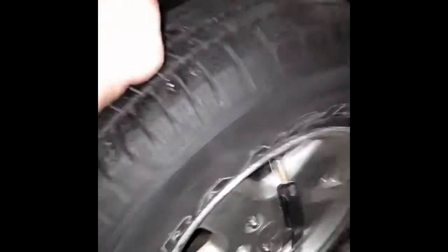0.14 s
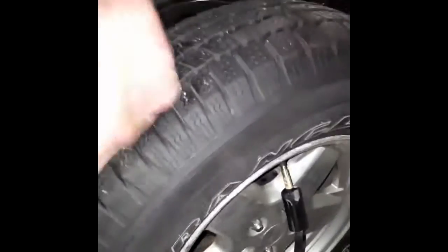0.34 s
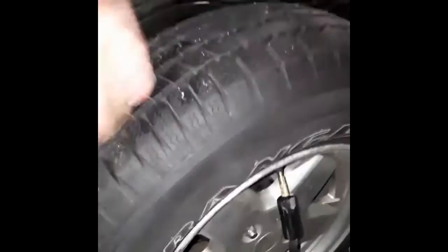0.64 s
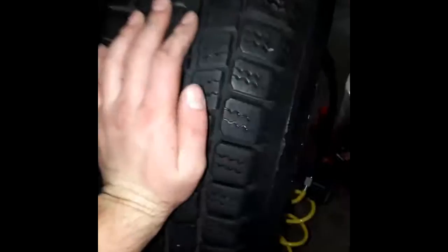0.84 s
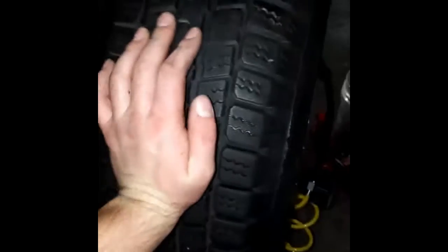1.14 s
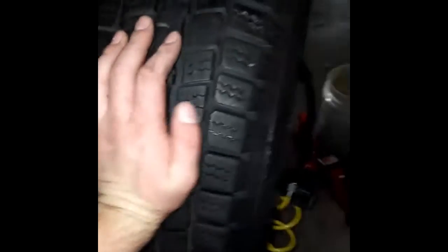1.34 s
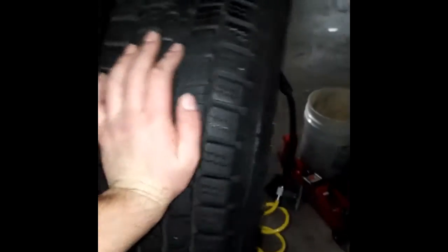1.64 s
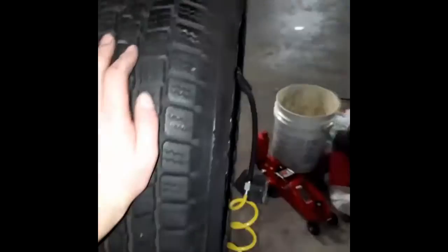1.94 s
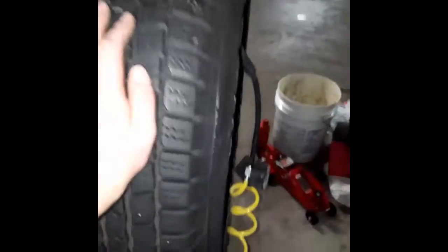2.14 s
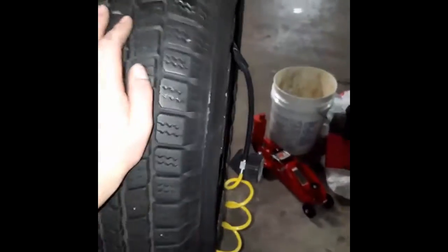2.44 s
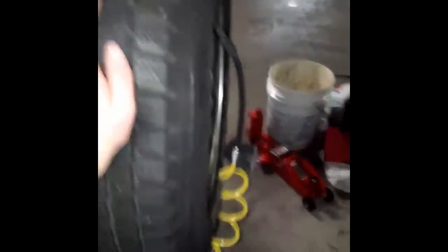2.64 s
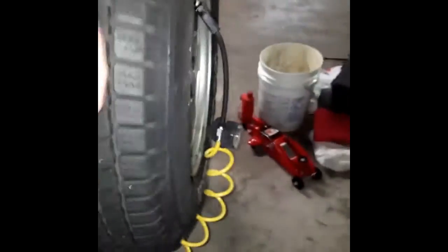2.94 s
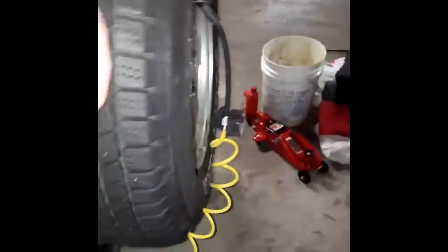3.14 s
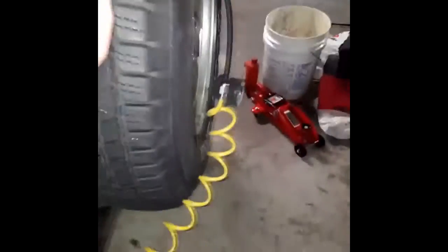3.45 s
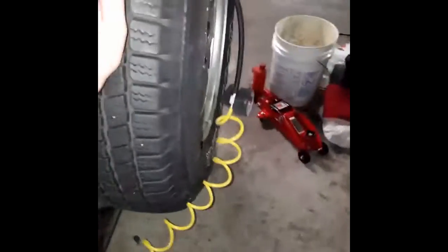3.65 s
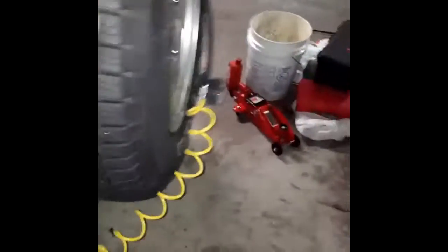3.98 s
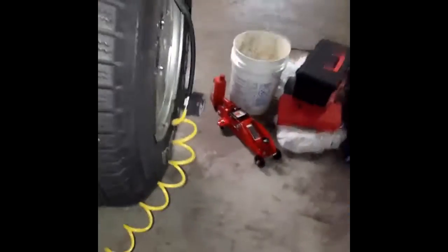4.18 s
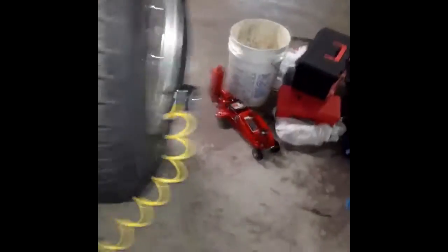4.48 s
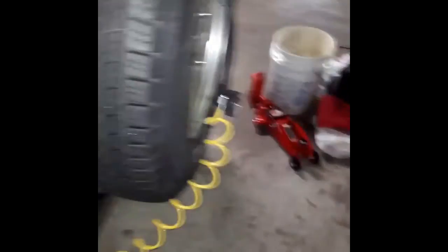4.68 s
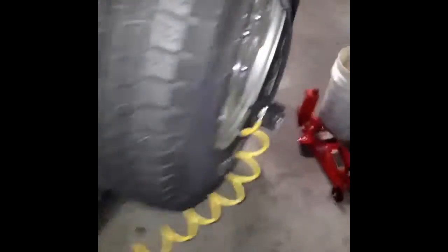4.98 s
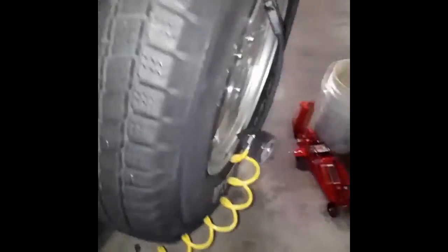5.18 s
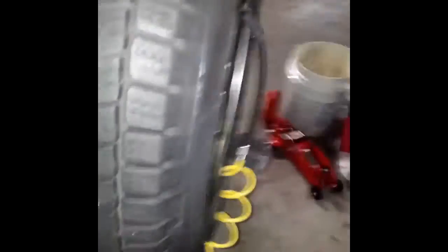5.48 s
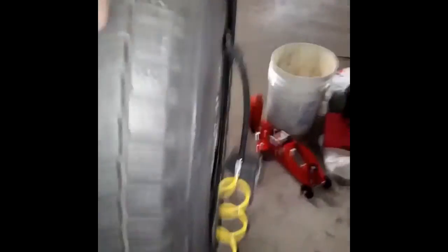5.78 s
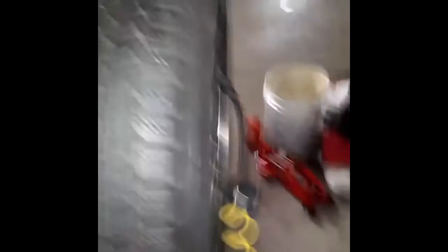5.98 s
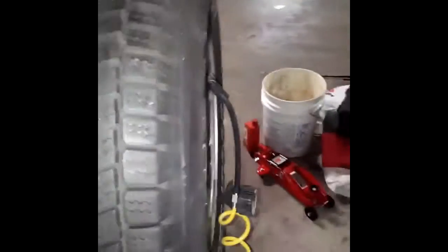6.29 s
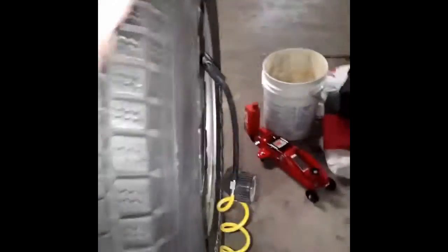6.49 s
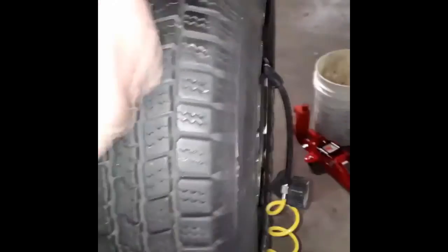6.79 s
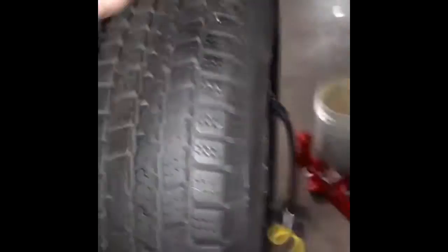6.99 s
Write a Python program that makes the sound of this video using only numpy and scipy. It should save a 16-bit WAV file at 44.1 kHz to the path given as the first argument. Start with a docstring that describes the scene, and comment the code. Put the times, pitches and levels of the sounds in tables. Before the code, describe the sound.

Handheld close recording beside a tire. Three low, hollow palm slaps come first in near quiet, then everything cuts to silence. A compressor's rapid harsh buzz fades up with a low throb felt through the tire, becoming clearer and more metallic with hissing air. Later six sharper, cracking slaps fall regularly over the running pump, which ducks after each hit and sounds more muffled toward the end.

```python
"""A small piston inflator drones, rattles and puffs in a garage, close to a car tire that partly shades it.
First a hand slaps the tire three times; after a silent pause the sound fades in on the running pump.
A palm resting on the tire feeds the pump's low throb to the microphone, then slaps six more times.
The pump brightens as the microphone comes round the tire into plain view and dulls as it goes back.
Loud slaps turn the recorder's gain down. Sources: decaying sines, filtered noise, harmonics of the stroke."""
import sys
import numpy as np
from scipy import signal
from scipy.fft import rfft, irfft, next_fast_len
from scipy.io import wavfile
from scipy.ndimage import map_coordinates

SR = 44100
rng = np.random.default_rng(int(sys.argv[2]) if len(sys.argv) > 2 else 0)


def wav_record(signal):
    """Record a signal, one row per channel, as 16-bit PCM in the file named by sys.argv[1]."""
    frames = np.transpose(np.atleast_2d(signal))
    bounded = np.clip(frames, -1, 1)
    # unit amplitude maps onto the largest positive 16-bit level
    quanta = np.round(bounded * 32767).astype(np.int16)
    wavfile.write(sys.argv[1], SR, quanta)


N = 314151
TIME = np.arange(N) / SR


def amp(db):
    """Decibels to gain."""
    return 10 ** (np.asarray(db) / 20)


def unit(x):
    """Scales to rms 1."""
    return x / np.sqrt(np.mean(x ** 2) + 1e-20)


def read(points, hz):
    """Reads a table on a log-frequency (or log-order) axis."""
    f, value = np.transpose(points)
    return np.interp(np.log(hz + 1), np.log(f + 1), value)


def curve(points):
    """A time table, sample by sample."""
    return np.interp(TIME, *np.transpose(points))


def add(mix, s, sound):
    """Lays a sound into the mix at time s."""
    part = mix[max(round(s * SR), 0):][:len(sound)]
    part += sound[:len(part)]


def noise(colour, size=N):
    """Noise of rms 1 with the given spectrum."""
    length = next_fast_len(size)
    gain = amp(read(colour, np.fft.rfftfreq(length, 1 / SR)))
    spectrum = rfft(rng.standard_normal(length)) * gain
    return unit(irfft(spectrum, length)[:size])


def wander(per_s):
    """A smooth random drift of rms 1, with per_s random knots a second."""
    knots = rng.standard_normal(int(N / SR * per_s) + 4)
    drift = map_coordinates(knots, [TIME[::64] * per_s], order=3, mode="nearest")
    return unit(drift)[np.arange(N) // 64]


# The tire's rubber and air cavity: (frequency [Hz], relative level [dB], t60 [s])
TIRE_MODES = [(79, -14.5, 0.071), (122.8, -22, 0.79), (129, -22, 0.38), (185, -14, 0.13),
              (234, -10.5, 0.085), (266.8, -24, 0.41), (341, -27, 0.11), (400, -47, 0.12), (498, -57, 0.54)]
# Dense flexing of the sidewall: (frequency [Hz], relative level [dB per Hz])
SIDEWALL_COLOUR = [(50, -13), (110, -13.5), (180, 5), (290, 8), (370, -3), (520, -11), (800, -19.5),
                   (2000, -52.5)]


def thump(hz, ring_db, rise_s=0.0024, tread_hz=370, tread_db=-11):
    """The tread dents, snaps and springs back, then the tire rings and its sidewall shudders."""
    t = np.arange(SR // 2) / SR
    bent_time = t + 0.00092 * (1 - np.exp(-t / 0.00053))  # the pitch starts high and settles at hz
    dent_envelope = (t / rise_s / 2) ** 2 * np.exp(2 - t / rise_s)
    dent = -np.sin(2 * np.pi * hz * bent_time) * dent_envelope
    snap_envelope = t / 0.0032 * np.exp(1 - t / 0.0031)
    snap = -amp(tread_db) * np.sin(2 * np.pi * tread_hz * t) * snap_envelope
    ring = np.zeros(len(t))
    for f, db, t60 in TIRE_MODES:
        ring += amp(db - 60 * t / t60) * np.sin(2 * np.pi * (f * t + rng.random()))
    shudder = amp(-16.5 - 60 * t / 0.28) * noise(SIDEWALL_COLOUR, size=len(t))
    onset = 1 - np.exp(-(t / 0.0056) ** 2)
    return dent + snap + amp(ring_db) * (ring + shudder) * onset


# Skin on rubber, for smacks and rubs: (frequency [Hz], relative level [dB per Hz])
SKIN_COLOUR = [(100, -17), (400, 17), (800, -2.5), (1700, 3.5), (2900, -4), (3700, -2.5), (5500, -8),
               (7300, 0), (8500, -19), (10000, -37.5), (13000, -20.5), (16000, -23)]


def smack(bright_db, cup_hz, cup_db=7, decay_s=0.0025, size=2048):
    """Air squeezed from under the cupped palm cracks for a few milliseconds."""
    t = np.arange(size) / SR
    hz = np.geomspace(50, SR / 2, num=200)
    cup_peak_db = cup_db * np.exp(-(np.log(hz / cup_hz) / 0.09) ** 2)
    colour_db = read(SKIN_COLOUR, hz) + bright_db * np.log2(hz) + cup_peak_db
    decay = 1.09 * np.exp(-t / decay_s) + 0.037 * np.exp(-t / 0.02)
    envelope = (1 - np.exp(-t / 0.00016)) * decay
    return noise(np.column_stack([hz, colour_db]), size=size) * envelope


# The palm rubs over the tread: (time [s], level at the height of the stroke [dB])
TREAD_RUBS = [(.385, -68), (.44, -65), (.665, -57), (.735, -52), (.805, -62)]
RUB_RISE_S, RUB_FADE_S = .015, .025


def rubbing(grain_db=2.0):
    """Skin drags over the tread in short, grainy strokes."""
    pressure = np.zeros(N)
    t = TIME[:SR // 2]
    stroke = np.minimum(t / RUB_RISE_S, np.exp((RUB_RISE_S - t) / RUB_FADE_S))
    for s, db in TREAD_RUBS:
        add(pressure, s, amp(db) * stroke)
    return pressure * amp(grain_db * wander(120)) * noise(SKIN_COLOUR)


# How long the garage rings: (frequency [Hz], t60 [s])
GARAGE_DECAY = [(60, 0.71), (160, 0.68), (420, .42), (1100, 0.61), (3000, 0.19), (8000, 0.36)]


def garage(x):
    """Dense wall echoes, each band dying at its own speed."""
    taps = rng.standard_normal(SR // 2) * (TIME[:SR // 2] > .011)  # the first wall answers after 11 ms
    hz, t, z = signal.stft(taps, SR, nperseg=256)
    decay = amp(-60 * t / read(GARAGE_DECAY, hz)[:, None])
    tail = signal.istft(z * decay, SR, nperseg=256)[1]
    return signal.fftconvolve(x, tail / np.linalg.norm(tail))[:N]


# Slaps on the tire: (time [s], thump level [dB], thump pitch [Hz], smack level [dB],
# smack brightness [dB per octave], cupped-palm pitch [Hz], ring re thump [dB], rebound re thump [dB])
TIRE_SLAPS = [(.006, -11, 127, -24.5, 1, 3400, -3.5, -19),
              (0.3616, -12.5, 124, -22.5, -0.5, 3600, -0.5, -25.5),
              (.652, -8.5, 125, -23, -.5, 1650, -3, -18), (5.046, -15.5, 142, -14.5, 0, 3320, -4, -11),
              (5.451, -14.5, 140, -13, 1, 2600, 0, -14), (5.7926, -9.5, 128, -14, 2, 2460, -0.5, -19),
              (6.1468, -11.5, 143, -12, -1.5, 3570, 2, -11.5), (6.483, -7, 115, -16, -1.5, 1380, -2, -7),
              (6.819, -8.5, 125, -19.5, -0.5, 3420, 0.5, -15)]
# Soft knocks: nudges of the hand, and at 6.509 s a further bounce of the tire after the slap before it: (time
# [s], level [dB], pitch [Hz])
SOFT_KNOCKS = [(.748, -32, 174), (2.765, -37, 130), (3.442, -38, 89), (4.40, -37, 150), (4.541, -34, 109),
               (4.58, -40, 130), (6.326, -31, 110), (6.509, -17, 177)]
# The tire rebounds after each slap; soft knocks leave it ringing more than slaps do
REBOUND_S, REBOUND_HZ, SOFT_RING_DB = .057, 204, 5


def hand():
    """Slaps with their rebounds, nudges and rubs on the tire; the garage answers all but the rubs."""
    thumps, smacks = np.zeros((2, N))
    for s, db, hz, smack_db, bright_db, cup_hz, ring_db, rebound_db in TIRE_SLAPS:
        add(thumps, s, amp(db) * thump(hz, ring_db))
        add(thumps, s + REBOUND_S, amp(db + rebound_db) * thump(REBOUND_HZ, SOFT_RING_DB))
        add(smacks, s, amp(smack_db) * smack(bright_db, cup_hz))
    for s, db, hz in SOFT_KNOCKS:
        add(thumps, s, amp(db) * thump(hz, SOFT_RING_DB))
    close = thumps + smacks
    return close + rubbing() + garage(amp(-13) * close)


# The quiet garage: (frequency [Hz], relative level [dB per Hz])
QUIET_COLOUR = [(30, -2), (130, 2), (400, -8.5), (900, -21.5), (3000, -27), (7200, -37.5), (7650, -15),
                (8000, -35), (15000, -50.5)]


def quiet_garage():
    """Steady, faint background noise."""
    return amp(-60) * noise(QUIET_COLOUR)


def ring_phase(lines, size=4096):
    """Minimum phases, which make a set of lines start as one blow and ring out after it."""
    order, db = np.transpose(lines)
    log_gain = np.log(amp(np.interp(abs(np.fft.fftfreq(size, 1 / size)), order, db)))
    return -signal.hilbert(log_gain).imag[np.round(order).astype(int)]


def strokes(turns, lines, at, scatter, size=4096):
    """One blow per turn at crank position at, ringing on; scatter [rad rms] loosens the phases."""
    order, db = np.transpose(lines)
    phase = ring_phase(lines) - 2 * np.pi * order * at + scatter * rng.standard_normal(len(order))
    spectrum = np.zeros(size // 2 + 1, complex)
    spectrum[np.round(order).astype(int)] = amp(db) * np.exp(1j * phase)
    one_turn = irfft(spectrum) * size / np.sqrt(2)
    return np.interp(turns % 1, np.arange(size) / size, one_turn, period=1)


def moving_echo(turns, lines, share, count=2):
    """Wall echoes of the strokes swell and fade line by line as the microphone moves about."""
    echoes = np.zeros(N)
    for _ in range(count):
        echoes += wander(1.272) * strokes(turns, lines, at=0, scatter=np.pi)
    return share * echoes / np.sqrt(count)


def metal_part(turns, lines, at, scatter, echo, uneven_db, gain_db=0):
    """A part struck once a turn with uneven force, heard with its echoes."""
    blows = strokes(turns, lines, at, scatter) + moving_echo(turns, lines, echo)
    return amp(gain_db) * unit(blows * amp(uneven_db * wander(61)))


def puff(turns, at, length, rest):
    """Air escapes once a turn as the valve opens, over a steady leak; at and length in turns."""
    age = (turns - at) % 1
    return unit(rest + np.exp(-age / length) * (1 - np.exp(-age / 0.033)))


def in_sight(part, view):
    """Gain of a part of the pump: it grows as the microphone comes round the tire."""
    shaded_db, gained_db = part
    return amp(shaded_db + gained_db * view)


# The palm rests on the tire: (lands [s], lifts [s], firmness at landing [dB])
PALM_RESTS = [(1.14, 2.768, 2), (6.323, 7.3, -4)]
TOUCH_S, EASE_DB_PER_S = 0.022, 5  # it lands and lifts quickly, and eases off while it rests
DIP_DEPTH, DIP_S = 0.47, 0.014


def palm():
    """How firmly the palm presses on the tire, and two brief dips of the drone."""
    contact, dip = np.zeros(N), np.ones(N)
    for lands, lifts, db in PALM_RESTS:
        touching = np.clip(np.minimum(TIME - lands, lifts - TIME) / TOUCH_S + .5, 0, 1)
        contact += touching * amp(db - EASE_DB_PER_S * (TIME - lands))
        for s in (lands, lifts):
            dip -= DIP_DEPTH * np.exp(-((TIME - s) / DIP_S) ** 2)
    return contact, dip


# Stroke lines with the pump in plain view: (multiple of the stroke rate, relative level [dB])
PLAIN_LINES = [(1, -27.5), (2, -21), (3, -44.5), (4, -32), (5, -28.5), (6, -29.5), (7, -4.5), (8, -6.5),
               (9, -1), (10, -22.5), (11, -8), (12, -13.5), (13, -20.5), (14, -36.5), (15, -22.5),
               (16, -25.5), (17, -18.5), (18, -30.5), (19, -29.5), (20, -28), (21, -20), (22, -35.5),
               (23, -22.5), (24, -26), (25, -36.5), (26, -25)]
# Stroke lines with the tire in the way: (multiple of the stroke rate, relative level [dB])
SHADED_LINES = [(1, -17), (2, -19.5), (3, -18), (4, -21), (5, -19.5), (6, -19), (7, -22.5), (8, -9), (9, 1),
                (10, -14), (11, -27), (12, -19.5), (13, -26.5), (14, -54), (15, -30), (16, -17), (17, -24),
                (18, -15.5), (19, -30.5), (20, -41), (21, -27), (22, -15.5), (23, -54), (24, -28.5),
                (25, -33), (26, -34.5)]
# Throb through the tire into the palm: (multiple of the stroke rate, level before firmness [dB])
PALM_THROB = [(1, -45.5), (2, -37), (3, -53), (4, -59.5), (5, -43), (6, -39), (7, -36.5), (8, -41.5),
              (9, -44), (10, -104)]
# Cylinder's knock: (time [s], level before the knock gain [dB])
KNOCK_COURSE = [(1.46, -44), (1.77, -44), (3.38, -41.5), (4.04, -54), (4.21, -46), (4.57, -60),
                (5.01, -41.5), (7.1, -44)]
# Overtone just below the main tone, fading and returning: (time [s], level, only its change counts [dB])
OVERTONE_COURSE = [(1.46, -27), (2.31, -37.5), (2.53, -30.5), (2.75, -40.5), (4.14, -30.5), (5.92, -33.5),
                   (6.25, -29.5), (7.1, -31.5)]
OVERTONE_ORDER = 8
DRONE = (-24, 0.98)  # (dB with the tire in the way, dB gained in plain view)


def pump_drone(turns, view, at=0.2007, spread=0.125, knock_gain_db=17.0, sway_db=2.0):
    """Low lines of the stroke: the tire shades some, and a resting palm feeds the lowest to the microphone."""
    contact, dip = palm()
    overtone_db = curve(OVERTONE_COURSE)
    drone_gain = in_sight(DRONE, view)
    knock_gain = amp(curve(KNOCK_COURSE) + knock_gain_db)
    drone = np.zeros(N)
    lines = zip(PLAIN_LINES, SHADED_LINES, ring_phase(PLAIN_LINES))
    for order, ((_, seen_db), (_, shaded_db), phase) in enumerate(lines, 1):
        knock = np.exp(-((order - 17) / 2.4) ** 4)  # how far this line belongs to the cylinder's knock
        # standing waves: higher lines waver more as the microphone moves
        sway = sway_db * order / len(PLAIN_LINES) * wander(2.45)
        if order == OVERTONE_ORDER:
            sway = sway + overtone_db - overtone_db.mean()
        line_gain = amp(view * seen_db + (1 - view) * shaded_db + sway)
        airborne = drone_gain ** (1 - knock) * knock_gain ** knock * line_gain
        gain = airborne + contact * amp(read(PALM_THROB, order))
        lag = spread * (order - 8) ** 2  # the garage's echoes smear each blow over the turn
        drone += np.sqrt(2) * gain * np.cos(2 * np.pi * order * (turns - at) + phase - lag)
    return drone * dip * amp(0.13 * wander(40))


# Lines of the housing: (multiple of the stroke rate, relative level [dB])
HOUSING_LINES = [(27, -21.5), (28, -15), (29, -3), (30, -19), (31, 1), (32, 0.5), (33, -6), (34, -33),
                 (35, -17), (36, -48.5), (37, -17), (38, -22)]
# Housing's rattle: (time [s], level before a 0.5 dB lift [dB])
RATTLE_COURSE = [(1.46, -39), (1.6, -33), (1.73, -37.5), (3.3, -32.5), (3.75, -34), (4.43, -39.5),
                 (5.14, -35.5), (5.23, -40), (6.83, -44.5), (7.1, -40.5)]


def housing_rattle(loose):
    """Each stroke shakes the housing, which rings on its own group of lines."""
    rattle = metal_part(loose, HOUSING_LINES, at=.92, scatter=1.0, echo=0.57, uneven_db=1.0, gain_db=0.5)
    return amp(curve(RATTLE_COURSE)) * rattle


# Shape of each valve resonance: (offset from its centre [Hz], relative level [dB])
VALVE_SHAPE = [(-330, -17.5), (-170, -6), (14, 5.5), (120, -1.5), (308, -19.5)]


def valve_lines(centre_hz):
    """The multiples of the stroke rate that fall around one valve resonance."""
    offset_hz, db = np.transpose(VALVE_SHAPE)
    order = np.round(centre_hz / STROKE_HZ) + np.arange(-5, 6)
    return np.column_stack([order, np.interp(order * STROKE_HZ - centre_hz, offset_hz, db)])


# Lower ring of the valve: (time [s], level before a 1 dB cut and the swells [dB])
LOW_VALVE_COURSE = [(1.46, -41), (2.28, -41), (3.33, -48.5), (3.45, -42.5), (5.81, -41.5), (6.0, -53.5),
                    (7.1, -43.5)]
VALVE_LOW_HZ, VALVE_HIGH_HZ = 3260, 3860
UPPER_VALVE = (-59.5, 14.5)  # (dB with the tire in the way, dB gained in plain view)
SWELL_DB, SWELLS_PER_S = 1.4, 4.09  # rms depth, and random knots per second


def valve_ring(loose, view):
    """The valve snaps and rings at two resonances, swelling and fading as the microphone moves."""
    low = metal_part(loose, valve_lines(VALVE_LOW_HZ), at=0.75, scatter=0.85, echo=0.14,
                     uneven_db=0.5, gain_db=-1.0)
    low *= amp(curve(LOW_VALVE_COURSE))
    high = metal_part(loose, valve_lines(VALVE_HIGH_HZ), at=0.858, scatter=0.43, echo=0.55, uneven_db=2.1)
    high *= in_sight(UPPER_VALVE, view)
    return sum(ring * amp(SWELL_DB * wander(SWELLS_PER_S)) for ring in (low, high))


# Colour of the buzz: (frequency [Hz], relative line level [dB])
BUZZ_COLOUR = [(2300, -6.5), (2750, -8), (3550, -0.5), (4300, -11.5), (4700, -11), (4950, 2.5), (5300, -12),
               (5700, 7), (6050, -13), (6250, 4.5), (6600, -15), (6950, 4.5), (7200, -11.5), (7500, 4.5),
               (7800, -28), (8300, -12.5), (9500, -29.5)]
BUZZING = (-44, 3.7)  # (dB with the tire in the way, dB gained in plain view)


def buzz(loose, view):
    """Struck metal buzzes on the high multiples of the stroke rate."""
    order = np.arange(39, 156)
    lines = np.column_stack([order, read(BUZZ_COLOUR, order * STROKE_HZ)])
    return in_sight(BUZZING, view) * metal_part(loose, lines, at=.93, scatter=0.64, echo=0.37, uneven_db=1.25)


# Air blown down the hose: (frequency [Hz], relative level [dB per Hz])
AIR_COLOUR = [(150, -10), (350, -2.5), (530, 14.5), (850, -2), (1500, 3.5), (1920, 7), (2700, -8),
              (3250, 1), (4300, -8.5), (5700, -0.5), (7300, 0), (8500, -6), (9700, -42), (11000, -48)]
# Finer hiss: (frequency [Hz], relative level [dB per Hz])
HISS_COLOUR = [(9800, -24), (10900, -7.5), (12000, -10), (13000, -6), (14400, -6.5), (15700, -20.5)]
BLOWING, HISSING = (-42.5, 4), (-57.5, 6.9)  # (dB with the tire in the way, dB gained in plain view)


def hose_air(turns, view):
    """Turbulent air, as broad noise and a finer hiss, puffs once a turn."""
    air = in_sight(BLOWING, view) * noise(AIR_COLOUR) * puff(turns, at=0.938, length=0.37, rest=0.41)
    hiss = in_sight(HISSING, view) * noise(HISS_COLOUR) * puff(turns, at=0.72, length=0.32, rest=0.21)
    return air * amp(.5 * wander(61)) + hiss


# How far the microphone has come round the tire: (time [s], share in plain view [0-1])
MICROPHONE_VIEW = [(1.2, 0.47), (2.0, 0.34), (2.7, 0.33), (2.9, 0.66), (4.2, 0.76), (5.1, 0.78),
                   (5.35, 0.73), (5.6, 0.37), (7.12, 0.14)]
STROKE_HZ = 61.065
# The crank runs slightly ahead of and behind its steady pace (turns rms, random knots per second)
DRIFT_TURNS, DRIFT_PER_S = 0.01103, 1.3


def inflator():
    """Every piston stroke drives the drone, shakes the housing, snaps the valve and puffs air."""
    view = np.clip(curve(MICROPHONE_VIEW), 0, 1)
    turns = STROKE_HZ * TIME + DRIFT_TURNS * wander(DRIFT_PER_S)
    loose = turns + 0.000092 * wander(56)  # play in the linkage shifts each blow slightly
    metal = housing_rattle(loose) + valve_ring(loose, view) + buzz(loose, view)
    return pump_drone(turns, view) + metal + hose_air(turns, view)


def gain_control(x, threshold_db=-20, share=0.75, attack_s=0.028, detector_fall_db_per_s=30):
    """Loud slaps turn the gain down by a share of their excess level, and it creeps back up."""
    keep = np.exp(-1 / (attack_s * SR))
    power = signal.lfilter([1 - keep], [1, -keep], x[0] ** 2)
    power_db = 10 * np.log10(power + 1e-12)
    fall = detector_fall_db_per_s * TIME
    held_db = np.maximum.accumulate(power_db + fall) - fall  # after a peak the reading sinks steadily
    over_db = np.maximum(held_db - threshold_db, 0)
    return x * amp(-share * over_db)


def scene():
    """The hand, the quiet garage and the inflator, which starts within the recorder's pause."""
    return (hand() + quiet_garage() + inflator() * (TIME > 1))[None]


PAUSE_FROM, PAUSE_TO, FADE_S = .845, 1.161, 0.32  # seconds
EDGE_HZ = 15800  # upper edge of the recorder's band


def record(dry, knee=0.76, headroom=.22):
    """The recorder ducks under the slaps, rounds off the largest peaks, pauses, fades in and limits the band."""
    before_pause = np.clip((PAUSE_FROM - TIME) / 0.0084, 0, 1)
    after_pause = np.clip((TIME - PAUSE_TO) / FADE_S, 0, 1)
    ducked = gain_control(dry)
    linear = np.clip(ducked, -knee, knee)
    rounded = linear + headroom * np.tanh((ducked - linear) / headroom)
    lowpass = signal.firwin(511, EDGE_HZ, window=("kaiser", 9), fs=SR)
    return signal.oaconvolve(rounded * (before_pause + after_pause), lowpass[None], "same")


dry = scene()
out = record(dry)
wav_record(out)
```